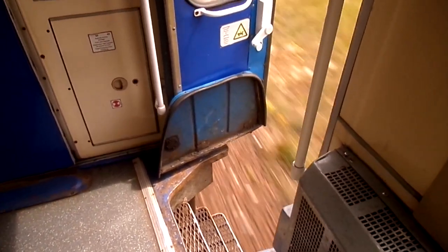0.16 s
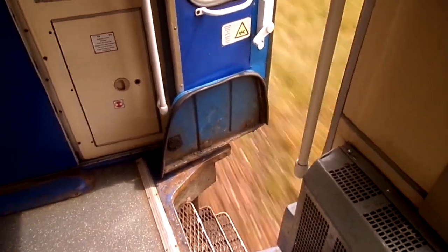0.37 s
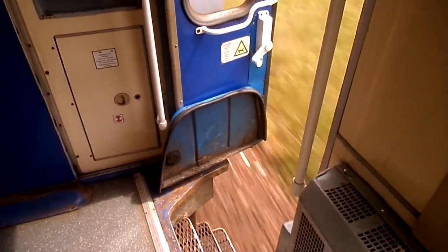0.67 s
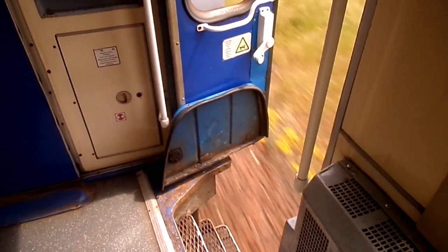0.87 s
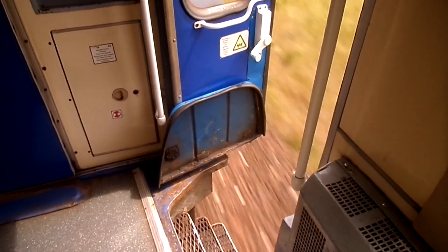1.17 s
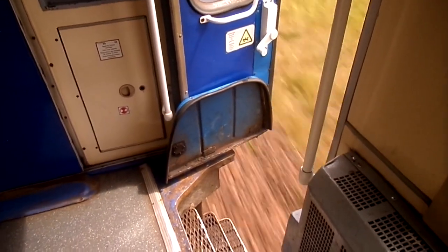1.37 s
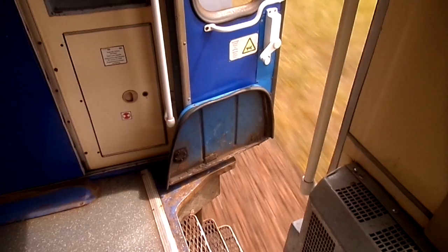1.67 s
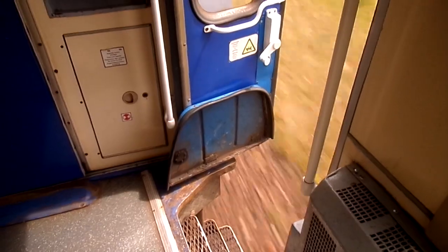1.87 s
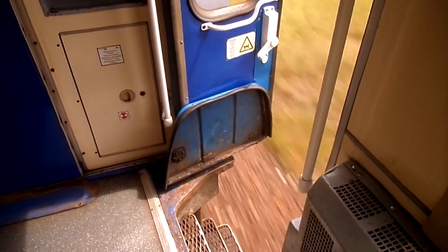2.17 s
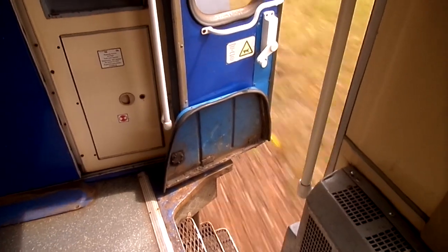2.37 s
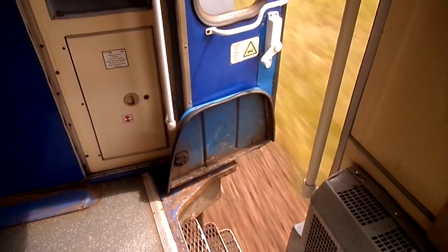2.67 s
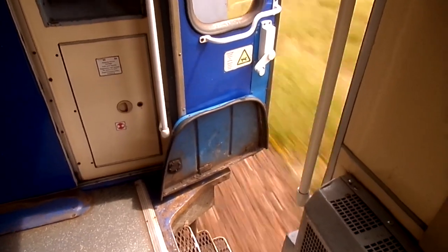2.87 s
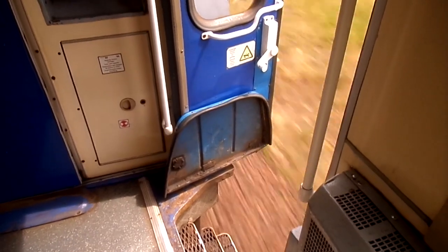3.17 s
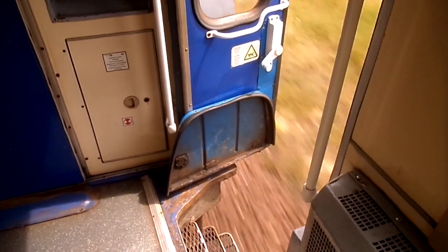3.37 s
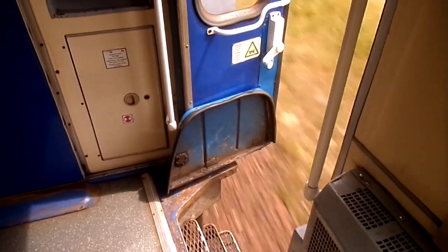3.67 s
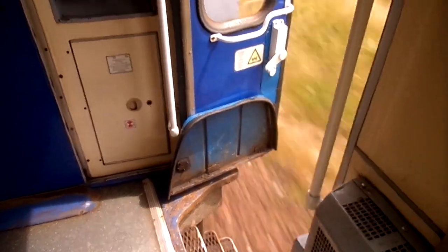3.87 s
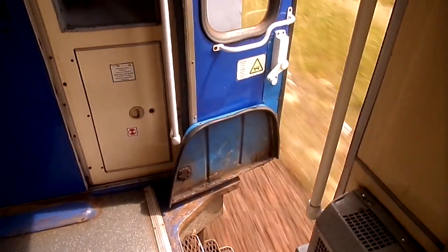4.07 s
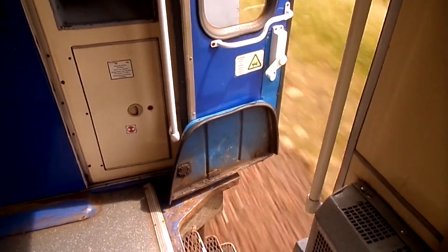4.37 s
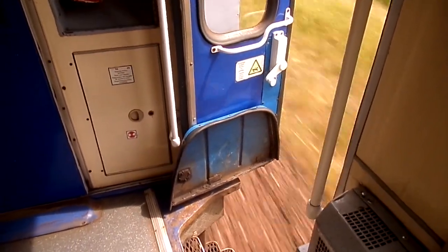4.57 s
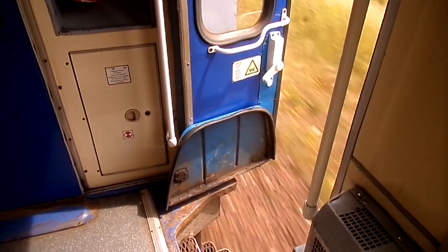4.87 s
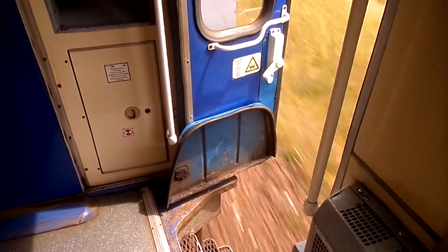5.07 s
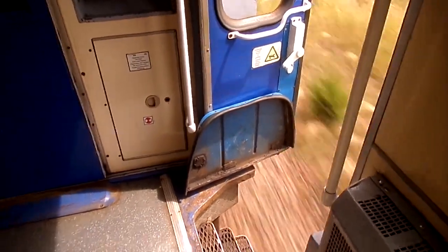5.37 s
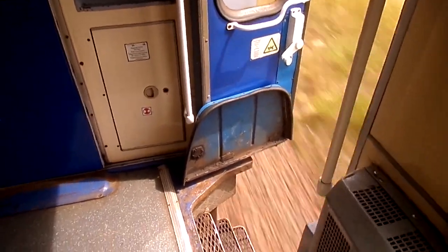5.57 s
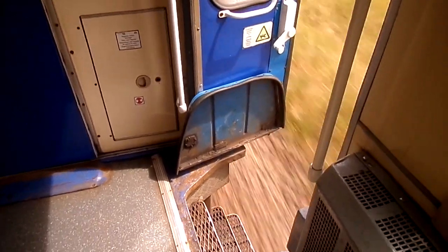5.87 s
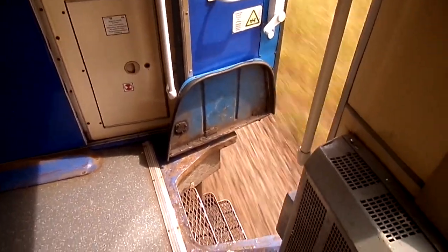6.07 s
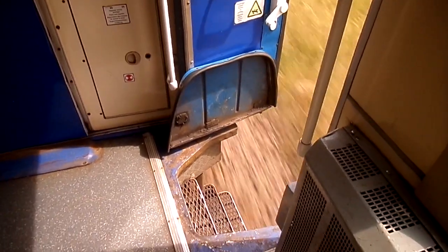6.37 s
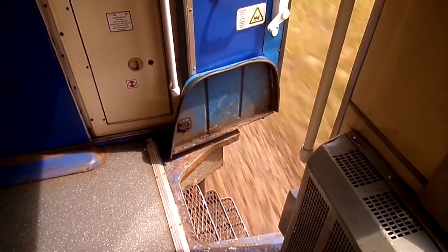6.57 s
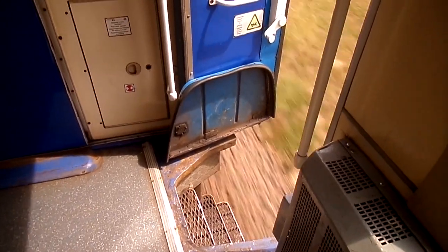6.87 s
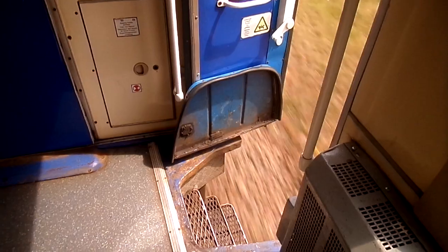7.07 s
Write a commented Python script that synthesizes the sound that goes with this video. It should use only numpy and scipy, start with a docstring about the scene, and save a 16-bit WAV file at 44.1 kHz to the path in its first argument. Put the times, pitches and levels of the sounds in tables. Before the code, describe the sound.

Steady train rush at an open coach door, swelling and dipping slightly. Under the airy hiss the rails and body ring in a blurred, hollow drone, with faint hums and whine drifting in level. From about one second wind gusts hit the unprotected microphone harder, fluttering low and popping sharply in uneven clusters. A faint deep rumble sits underneath. Close, rough, mono sound, cut off while still moving.

```python
"""Open door of a moving coach

The vestibule of a moving passenger coach with its outer door open. Wheels and rails give a broad
noise roar and make the body sing in narrow bands of resonant noise, with a whine and two hums as tones.
The air stream past the door is shaped noise: a hiss in three bands that flicker partly together.
Its eddies buffet a bare microphone with lumpy low noise and pop as short swings of pressure;
the body adds a steady deep rumble."""
import sys
import numpy as np
from scipy import signal
from scipy.fft import rfft, irfft, next_fast_len
from scipy.io import wavfile

SR = 44100
rng = np.random.default_rng(int(sys.argv[2]) if len(sys.argv) > 2 else 0)


def bounce(signal):
    """Save signal as a 16-bit WAV file at the path given by the first command-line argument."""
    frames = np.transpose(np.atleast_2d(signal))
    limited = np.clip(frames, -1, 1)
    pcm = np.round(limited * 32767).astype(np.int16)
    wavfile.write(sys.argv[1], SR, pcm)


N = 318402  # samples


def from_db(db):
    """Gain of a level in dB."""
    return 10 ** (np.asarray(db) / 20)


def rms_one(x):
    """Scale to rms 1."""
    return x / np.sqrt(np.mean(x ** 2) + 1e-20)


def in_time(rows):
    """Columns of a curve table, one value per sample."""
    s, *columns = np.transpose(rows)
    return [np.interp(np.arange(N) / SR, s, column) for column in columns]


def drift(corner_hz):
    """Slow random wander of rms 1: noise through two equal one-pole low-passes."""
    step = 40  # samples between the computed points
    r = np.exp(-2 * np.pi * corner_hz * step / SR)
    noise = rng.standard_normal(N // step + 2002)
    slow = signal.lfilter([1], [1, -2 * r, r * r], noise)[2000:]  # drop the run-in
    return np.interp(np.arange(N) / step, np.arange(len(slow)), rms_one(slow))


def coloured(x, spectrum):
    """Shape x with a spectrum drawn over log frequency; rms 1."""
    size = next_fast_len(N)
    hz, level_db = np.transpose(spectrum)
    at_hz = np.maximum(np.arange(size // 2 + 1) * SR / size, 1)
    gain = from_db(np.interp(np.log(at_hz), np.log(hz), level_db))
    return rms_one(irfft(rfft(x, size) * gain, size)[:N])


def resonance(x, hz, width_hz):
    """Two-pole band-pass of gain 1 on top, applied twice for steep flanks."""
    r = np.exp(-np.pi * width_hz / SR)
    b = np.array([1, 0, -1]) * (1 - r * r) / 2
    a = [1, -2 * r * np.cos(2 * np.pi * hz / SR), r * r]
    return signal.lfilter(b, a, signal.lfilter(b, a, x))


# the whole rush, swelling and dropping: start_s, relative_level_db
RUSH_CURVE = [(0.0, -1), (0.15, 1), (0.49, 3), (0.54, 0), (0.8, 2.5), (1.45, 2.5), (1.85, 2.5), (1.9, -1),
              (2.4, -3), (2.62, -1), (2.72, -4.5), (3.3, -1), (4.26, 2.5), (4.32, -4.5), (4.55, -3.5),
              (5.05, -1), (5.22, 1.5), (5.32, 0.5), (5.42, 5), (5.52, 1), (5.8, -0.5), (6.1, 3), (6.93, 2),
              (6.98, 0), (7.22, 0.5)]


def rush():
    """Level curve in dB that carries the roar, singing and main hiss together."""
    level_db, = in_time(RUSH_CURVE)
    return level_db


# wheel and rail roar, relative spectrum: pitch_hz, density_db (per Hz)
ROAR_SPECTRUM = [(100, -59), (300, -13), (500, -20.5), (700, -5), (1000, -11), (1350, -15), (1700, -10.5),
                 (2400, -28), (4000, -41.5), (16000, -90)]
# wheel, rail and body resonances: pitch_hz, width_hz (of each filter pass), level_db (within its group)
RESONANCES = [(535.5, 45, -8), (612.3, 17, -4), (635.7, 14.6, 1), (646.8, 14.6, 2), (661, 9.6, 1),
              (682, 21, 1), (697, 29, -3.5), (733.7, 15, -7), (766, 33, -12.5), (783, 13.5, 1),
              (816.3, 28, -3.5), (857.4, 16, -5.5), (886, 15, -3), (933, 13, -3.5), (978, 65, -7.5),
              (1150, 52, -10.5), (1259, 117, -14.5), (1541, 46, -1.5), (1616, 45, -0.5), (1689, 67, -1.5),
              (1744, 33, -3), (1813, 320, -11.5), (2304, 33, -5.5)]
# singing above or below the rush: start_s, low_db, middle_db, high_db
SINGING_CURVES = [(0, -3.5, 4.5, 3), (.3, 2, 2.5, -3), (.8, 0.5, 0, -1.5), (1.4, 2.5, 2.5, 1),
                  (2.0, 0, 1, 0.5), (2.9, -0.5, -0.5, -0.5), (3.6, 1, 0, -2), (4.2, -0.5, -3, -1),
                  (5.05, 0.5, -2, -2), (5.5, 2.5, 0.5, -1), (5.9, -0.5, -2.5, 0), (6.5, -1.5, -3, -1),
                  (6.9, 5, -1, 4), (7.22, 2, -3.5, 1)]
GROUP_EDGES_HZ = [740, 1400]  # between low, middle and high singing
# roar, then low, middle and high singing: base level (dB) and how it follows the rush (dB per dB)
ROLLING_DB, ROLLING_FOLLOWS = [-33.5, -33.5, -34.5, -43], [0.99, 0.91, 0.52, 0.73]


def wheels(rush_db, swell_db, waver_db, flicker_db):
    """Rail roughness roars and drives resonances, which swell and fade by group and on their own."""
    roar_db, *singing_db = [db + follows * rush_db for db, follows in zip(ROLLING_DB, ROLLING_FOLLOWS)]
    roar = coloured(rng.standard_normal(N), ROAR_SPECTRUM)
    out = roar * from_db(roar_db + flicker_db * drift(3.5))
    groups = np.zeros((len(singing_db), N))
    for hz, width_hz, db in RESONANCES:
        ringing = resonance(rng.standard_normal(N), hz, width_hz)
        groups[np.searchsorted(GROUP_EDGES_HZ, hz)] += ringing * from_db(db + waver_db * drift(4.4))
    for level_db, above_db, group in zip(singing_db, in_time(SINGING_CURVES), groups):
        out += from_db(level_db + above_db + swell_db * drift(3.2)) * rms_one(group)
    return out


def tone(level_db, hz, wander_hz, waver_db):
    """A thin sine whose pitch and level wander a little."""
    moving_hz = hz + wander_hz * drift(6.1)
    sine = np.sin(2 * np.pi * np.cumsum(moving_hz) / SR)
    return np.sqrt(2) * from_db(level_db + waver_db * drift(9.7)) * sine


# thin whine of the wheels, before wavering: start_s, level_db
WHINE_CURVE = [(0, -44), (.6, -57.5), (1.3, -47), (1.8, -54), (2.4, -57), (3.4, -54), (4.0, -52),
               (4.6, -56), (5.0, -44.5), (5.4, -54), (5.6, -41), (5.8, -49), (6.05, -48), (6.3, -38),
               (6.7, -44.5), (6.85, -37), (7.0, -51), (7.22, -48)]
# the two steadiest lines in the singing, before wavering: start_s, lower_hum_db, upper_hum_db
HUM_CURVES = [(0, -41, -41), (.3, -39, -38), (.5, -36, -40), (.65, -45.5, -44), (1.1, -43, -37.5),
              (1.38, -38, -27), (1.5, -33.5, -48), (1.8, -44, -35.5), (2.3, -43.5, -45), (2.6, -35.5, -47),
              (2.9, -54, -49), (3.4, -39, -45), (4.0, -45, -41), (4.5, -46, -46.5), (5.05, -40, -43),
              (5.5, -45, -47), (5.749, -52, -57), (6.2, -45, -44), (6.9, -32, -54), (7.22, -42, -51)]
WHINE_HZ, WHINE_WANDER_HZ, WHINE_WAVER_DB = 1694, 4, 3
HUM_HZ, HUM_WANDER_HZ, HUM_WAVER_DB = (650, 787), 3.5, 3.5


def wheel_tones():
    """The whine of the wheels and the two hums below it, each a wandering sine."""
    out = tone(*in_time(WHINE_CURVE), WHINE_HZ, WHINE_WANDER_HZ, WHINE_WAVER_DB)
    for level_db, hz in zip(in_time(HUM_CURVES), HUM_HZ):
        out += tone(level_db, hz, HUM_WANDER_HZ, HUM_WAVER_DB)
    return out


# relative spectra of main hiss, treble hiss and very highest hiss: pitch_hz, density_db (per Hz)
HISS_SPECTRUM = [(1000, -22.5), (2000, 1), (3000, -3), (4800, -7.5), (7000, -13), (8500, -18.5),
                 (11000, -30.5), (16000, -60)]
TREBLE_SPECTRUM = [(5000, -16), (7500, -3), (9000, -1.5), (11000, -3.5), (13500, -6), (16000, -18.5)]
TOP_SPECTRUM = [(12000, -30), (14000, -10), (15000, 7), (15500, 1), (16000, -24)]
# upper hiss bands, before flicker: start_s, treble_db, top_db
UPPER_HISS_CURVES = [(0.0, -54, -67), (0.06, -55.5, -65), (0.44, -50, -60), (0.58, -55.5, -66),
                     (0.98, -50.5, -59.5), (1.2, -53.5, -63), (1.47, -50.5, -57), (1.55, -53, -63),
                     (1.85, -53.5, -59), (2.41, -56, -66), (2.61, -51, -62), (2.73, -60, -65),
                     (3.38, -55, -62.5), (3.48, -56.5, -68), (4.06, -51.5, -60), (4.26, -53.5, -60.5),
                     (4.34, -59.5, -64), (5.03, -56, -59.5), (5.15, -54, -57), (5.47, -49.5, -61),
                     (5.53, -55, -68), (5.65, -52, -63), (5.81, -59.5, -69.5), (6.09, -53.5, -65.5),
                     (6.94, -53.5, -66.5), (7.22, -56, -68)]
HISS_DB = -39.5  # main hiss, before the rush moves it


def air(rush_db, flicker_db):
    """Turbulence at the door edges hisses in three bands that flicker partly together."""
    together = drift(12.5)
    hiss = coloured(rng.standard_normal(N), HISS_SPECTRUM)
    out = hiss * from_db(HISS_DB + rush_db + flicker_db * together)
    for spectrum, level_db in zip((TREBLE_SPECTRUM, TOP_SPECTRUM), in_time(UPPER_HISS_CURVES)):
        flicker = 0.5 * together + 1.8 * drift(11)
        out += coloured(rng.standard_normal(N), spectrum) * from_db(level_db + flicker_db * flicker)
    return out


# shaking of the coach body, relative spectrum: pitch_hz, density_db (per Hz)
RUMBLE_SPECTRUM = [(12, -12), (25, -9), (50, -3), (120, -15), (1000, -70)]


def rumble(level_db):
    """The coach body shakes steadily at the bottom of hearing."""
    return from_db(level_db) * coloured(rng.standard_normal(N), RUMBLE_SPECTRUM)


# gusts on the microphone: start_s (of full strength), hold_s, level_db (added in power to the lull)
GUST_ROWS = [(0.16, 0.024, -36), (0.33, 0.031, -38), (0.437, 0.036, -33.5), (0.663, 0.055, -32.5),
             (0.88, 0.015, -27.5), (0.921, .05, -27), (0.995, .06, -26), (1.09, 0.025, -24.5),
             (1.14, .025, -25.5), (1.19, .08, -36), (1.308, 0.093, -29), (1.46, 0.056, -26.5),
             (1.624, 0.048, -27), (1.678, 0.044, -29.5), (1.821, 0.11, -28), (1.971, 0.088, -22),
             (2.092, 0.053, -26), (2.189, 0.13, -26), (2.459, 0.043, -27), (2.565, 0.14, -25),
             (2.792, 0.097, -33.5), (2.998, 0.2, -31), (3.33, 0.08, -32.5), (3.482, 0.067, -27.5),
             (3.739, 0.031, -27), (3.803, 0.021, -21.5), (3.902, 0.032, -21.5), (3.937, 0.049, -26),
             (4.013, 0.13, -24), (4.199, 0.1, -24.5), (4.37, 0.21, -31), (4.606, 0.033, -31.5),
             (4.679, 0.088, -27), (4.9, 0.1, -34.5), (5.059, 0.17, -27.5), (5.271, 0.057, -27),
             (5.452, 0.066, -33.5), (5.545, 0.045, -25.5), (5.677, 0.044, -30), (5.88, .11, -34.5),
             (6.02, 0.063, -29.5), (6.109, 0.12, -28), (6.328, 0.063, -30), (6.419, 0.089, -28),
             (6.536, 0.27, -26), (6.844, 0.06, -25), (6.916, 0.031, -21.5), (6.986, 0.013, -27),
             (7.092, 0.025, -23.5), (7.128, 0.06, -28)]
GUST_RISE_S, GUST_FALL_S = 0.022, 0.0295
LULL_DB, LULL_WAVER_DB = -37.5, 2


def gusts():
    """Wind level in dB: a wavering lull, and gusts that rise, hold and fall."""
    t = np.arange(N) / SR
    power = from_db(2 * (LULL_DB + LULL_WAVER_DB * drift(7.9)))  # doubled dB gives power
    for start, hold, db in GUST_ROWS:
        end = start + hold
        shape = np.interp(t, [start - GUST_RISE_S, start, end, end + GUST_FALL_S], [0, 1, 1, 0])
        power = power + (from_db(db) * shape) ** 2
    return 10 * np.log10(power)


# buffeting on the microphone, relative spectrum: pitch_hz, density_db (per Hz)
BUFFET_SPECTRUM = [(20, -26), (40, -10), (100, -3), (200, -3), (400, -9), (700, -9.5), (1500, -21.5),
                   (4000, -44), (16000, -95)]


def buffeting(gust_db, lumps_db, eddy_share):
    """Pressure eddies passing the microphone: lumpy low noise plus many small separate pushes."""
    lumps = from_db(lumps_db * drift(36.0))
    born = rng.random(N) < 150 / SR  # 150 pushes a second on average
    sizes = from_db(2.4 * np.minimum(rng.exponential(1, N), 4)) * rng.choice([-1, 1], N)
    eddies = rms_one(born * sizes)
    push = np.sqrt(1 - eddy_share) * rng.standard_normal(N) + np.sqrt(eddy_share) * eddies
    return from_db(gust_db) * coloured(push * lumps, BUFFET_SPECTRUM)


POP_HALF_SPAN = 600  # samples kept on each side of a pop
SMALL_POPS_PER_S = 24  # average, before leaving out the very ends
SMALL_POP_DB, SMALL_POP_SPREAD_DB = -28.5, 8.5  # centre and half range, at mean wind
SMALL_POP_FOLLOWS = 0.27  # dB per dB of wind
SMALL_POP_HZ, SMALL_POP_MS, SMALL_SNAP_DB = (245, 505), (0.41, 2.2), -9


def small_pops(gust_db):
    """Weaker eddies as rows for pops(), born by chance at a rate that follows the wind."""
    wind = from_db(gust_db)
    born = np.flatnonzero(rng.random(N) < SMALL_POPS_PER_S * wind / wind.mean() / SR)
    born = born[(born > POP_HALF_SPAN) & (born < N - POP_HALF_SPAN)]
    size, pitch, length = rng.random((3, len(born)))
    level_db = SMALL_POP_DB + SMALL_POP_FOLLOWS * (gust_db[born] - gust_db.mean())
    level_db += SMALL_POP_SPREAD_DB * (2 * size - 1)
    pitch_hz = np.interp(pitch, [0, 1], SMALL_POP_HZ)
    length_ms = np.interp(length, [0, 1], SMALL_POP_MS)
    return np.transpose([born / SR, level_db, pitch_hz, length_ms, np.full(len(born), SMALL_SNAP_DB)])


def snap(t, edge_ms, edge_hz):
    """A sudden push of height 1 that dies within a swing or two: its spectrum is broad."""
    after = np.maximum(t, 0)
    push = np.exp(-1000 * after / edge_ms) * np.sin(2 * np.pi * edge_hz * after)
    return push / push.max()


# strong eddies on the microphone:
# centre_s, level_db (bell peak), pitch_hz, length_ms (bell width 3 dB down), snap_db (against level_db)
STRONG_POPS = [(0.171, -18.5, 350, 1.7, -30), (0.886, -20, 292.5, 1.7, -30), (0.917, -9, 128, 2.7, -30),
               (0.923, -11, 365, 2, -11), (0.956, -18, 130, 3, -28), (1.019, -11, 370, 1.2, -16),
               (1.064, -14, 384, 2, -30.5), (1.092, -12.5, 343, 3.3, -16.5), (1.169, -15, 314, 2.7, -30),
               (1.33, -17.5, 240, 3.2, -30), (1.365, -5, 415, 0.9, -8), (1.474, -20, 519, 6.7, -30),
               (1.701, -13, 250, 1.6, -20), (1.718, -7, 349.6, 0.61, -9), (1.838, -13, 200, 1.96, -20),
               (1.843, -9, 483, 2.3, -3), (1.852, -10.5, 171, 4.4, -12), (1.863, -19.5, 275, 7.3, 2),
               (2.009, -13, 358, 1.95, -18), (2.022, -15, 309, 2, -20), (2.033, -16.5, 212, 5.6, -28.5),
               (2.067, -16, 350, 3, -10.5), (2.138, -11, 487, 1.3, -30), (2.1917, -10, 1000, 0.36, -25),
               (2.1945, -10.5, 500, 0.85, -5), (2.204, -15.5, 450, 1, -20), (2.22, -12, 180, 2.5, -30),
               (2.237, -8.5, 370, 1.06, -20), (2.272, -25, 150, 2.8, -29.5), (2.299, -9.5, 349, 1.2, -13),
               (2.5, -12, 403, 1.3, -25), (2.591, -9, 520, 1.23, -13.5), (2.5935, -15.5, 600, 1.1, -15.5),
               (2.5947, -13.5, 1690, .6, 1), (2.5957, 2, 640, 0.83, -12), (2.5985, -15.5, 744, 1.3, -3.5),
               (2.612, -20, 650, 1.3, -15), (2.623, -14, 251.7, 2.2, -9),
               (2.6232, -22.5, 3800, 0.19, -29.5), (2.6705, -20, 1200, .6, -10),
               (2.692, -17, 390, 0.72, -21), (2.822, -13, 261, 1.1, -25), (3.034, -17, 392, 1.6, -20),
               (3.102, -13, 212, 2.3, -31.5), (3.1185, -7, 491, 2.7, 0), (3.122, -12, 600, 1.2, -15),
               (3.125, -18, 598, 0.64, 2.5), (3.1187, -16, 2500, .4, -25), (3.1253, -23, 3500, 0.5, -10),
               (3.1272, -24.5, 3800, 0.45, -6), (3.1268, -10.5, 1500, .45, -5), (3.129, -3, 497, 0.97, -11),
               (3.136, -17, 505, 1.5, -8.5), (3.194, -10.5, 600, 0.85, -7), (3.39, -11, 241, 1.1, -19),
               (3.512, -18.5, 220.7, 1.7, -30.5), (3.812, -9.5, 368.5, 1.7, -3.5),
               (3.818, -12.5, 330, 0.97, -15), (3.911, -8, 297.7, 0.85, -7), (3.956, -16, 420, 1.6, -16),
               (4.031, -11.5, 293, 1.2, -19), (4.0845, -13, 700, 1.1, -20), (4.088, -16, 400, 0.81, -20),
               (4.096, -11, 454, 0.83, -19), (4.102, -9, 897, 0.6, -4), (4.242, -10, 189, 1.7, -25),
               (4.257, -9, 239, 2.4, -25), (4.2633, -14.5, 1800, 0.56, -25), (4.265, -19, 798, 0.92, -11.5),
               (4.2697, -2.5, 293, 1.5, -14), (4.275, -16, 351, 2.4, -20.5), (4.283, -12, 562, 1.1, -10),
               (4.2875, -16, 400, 1.5, 2), (4.295, -12.5, 337, 1.8, -15), (4.374, -11, 416, 0.86, -30),
               (4.448, -21, 350, 1.3, -25), (4.48, -18, 279, 1.6, -24), (4.542, -17, 596, 0.77, -20),
               (4.545, -12.5, 646, 0.7, -7), (4.551, -10, 1200, 0.4, -25), (4.624, -13.5, 248.6, 2.9, -27),
               (4.729, -5.5, 362, 0.87, -9.5), (4.768, -14, 337, 2.7, -30), (5.061, -11, 720, 1.6, -7.5),
               (5.0805, -9, 496, 1.4, -10), (5.0835, 0, 475, 0.51, -21), (5.114, -15, 330, 2.3, -30),
               (5.143, -14.5, 302, 1.5, -20), (5.174, -10.5, 292.5, 1.4, -30), (5.504, -12, 288, 2.6, 0),
               (5.551, -16, 256.4, 3.26, -30), (5.772, -21.5, 110, 4, -29), (5.874, -23, 280, 2.2, -30),
               (6.034, -17.5, 180, 2.3, -32), (6.083, -15, 330, 1.5, -20), (6.143, -15, 328, 2.2, -25),
               (6.425, -15.5, 309.6, 1.8, -30), (6.484, -13, 204, 2.5, -15.5), (6.526, -13, 803, 1.2, -15),
               (6.544, -14, 676, 3.5, -31), (6.548, -22, 500, 1.5, -27.5), (6.622, -9, 403, 1.5, -20),
               (6.625, -9.5, 697, 1.1, -12.5), (6.6274, -4.5, 1350, 0.35, -30),
               (6.6292, -16, 547, 1.3, -20), (6.6325, -10, 420, 2.4, -11), (6.64, -16, 337, 3.9, -30),
               (6.779, -2.5, 451, 0.75, -17), (6.804, -11, 318, 2.34, 2), (6.86, -11.5, 397, 2, -30.5),
               (6.928, -5, 204.3, 1.7, -30), (6.932, -10, 303, 1.8, -15), (6.936, -4, 524, 1.6, -14),
               (6.94, -14, 654, 1.8, -12), (6.95, -12, 513, 3.1, -30), (6.97, -14, 195, 2.1, -30),
               (6.988, -16.5, 650, 1.3, -8), (7.095, -11, 259.4, 1.7, -18), (7.098, -7, 328, 1.6, -26),
               (7.139, -8.5, 333, 1.1, -17.5)]


def pops(rows, apart_ms, side_share, dull_hz):
    """Each eddy swings the pressure under a bell shape, with three quick snaps, often faint, on top."""
    out, t = np.zeros(N), np.arange(-POP_HALF_SPAN, POP_HALF_SPAN) / SR
    dull = signal.butter(4, dull_hz, fs=SR, output="sos")  # the snaps have little above this
    for (s, db, hz, ms, snap_db), (turn, lag, lead, side) in zip(rows, rng.random((len(rows), 4))):
        bell = np.exp(-2 * np.log(2) * (1000 * t / ms) ** 2)
        swing = bell * np.cos(2 * np.pi * (hz * t + turn))
        # a main snap, then a weaker one after it and one before it
        edge = snap(t, .45, 1300)
        edge -= side_share * snap(t - apart_ms * (1 + lag) / 1000, .35, 1700)
        edge += side_share * snap(t + apart_ms * (1 + lead) / 1000, .25, 2600)
        edge = signal.sosfilt(dull, np.sign(side - .5) * edge)  # push or pull by chance
        at = round(s * SR) - POP_HALF_SPAN
        out[at:at + len(t)] += from_db(db) * (swing + from_db(snap_db) * edge)
    return out


def scene():
    """Roar, singing, hiss, rumble, buffeting and pops at one microphone."""
    rush_db = rush()
    gust_db = gusts()
    mix = wheels(rush_db, swell_db=0.43, waver_db=0.63, flicker_db=1.5)
    mix += wheel_tones()
    mix += air(rush_db, flicker_db=0.77)
    mix += rumble(level_db=-50.0)
    mix += buffeting(gust_db, lumps_db=3.0, eddy_share=0.32)
    mix += pops([*STRONG_POPS, *small_pops(gust_db)], apart_ms=0.55, side_share=0.28, dull_hz=4960)
    return mix[None]


CEILING = .8  # full scale is 1
CUTOFF_HZ = 15920  # stop-band edge


def record(dry):
    """Peaks are rounded by a soft ceiling, then the top is cut steeply."""
    rounded = CEILING * np.tanh(dry / CEILING)
    steep = signal.cheby2(30, 60, CUTOFF_HZ, fs=SR, output="sos")
    return signal.sosfilt(steep, rounded)


dry = scene()
out = record(dry)
bounce(out)
```